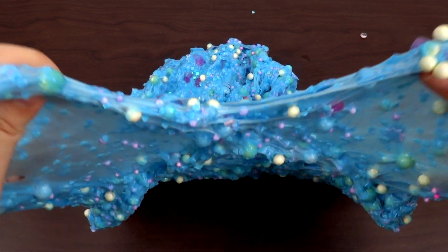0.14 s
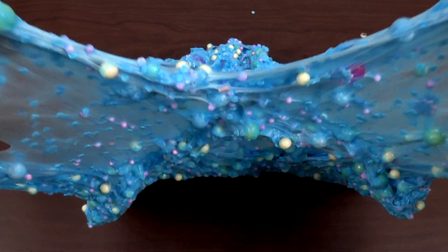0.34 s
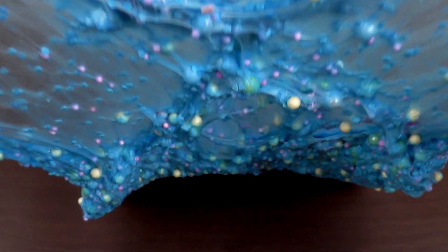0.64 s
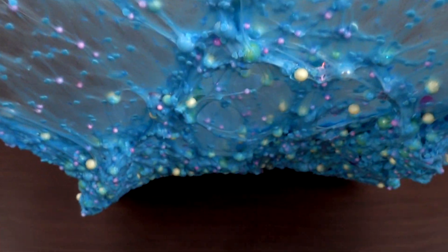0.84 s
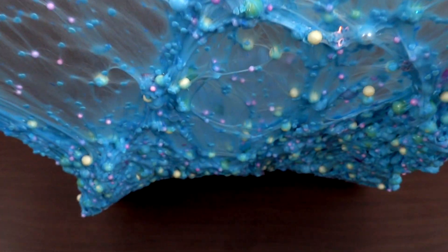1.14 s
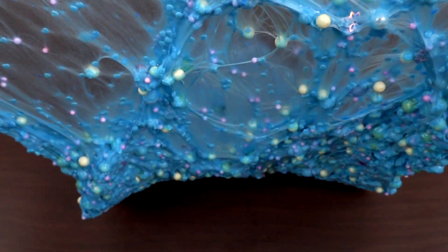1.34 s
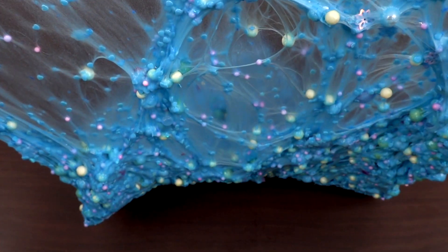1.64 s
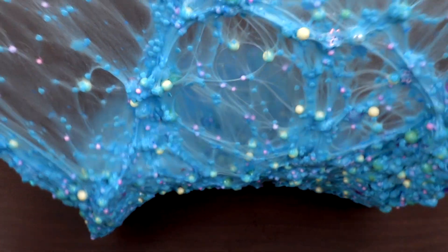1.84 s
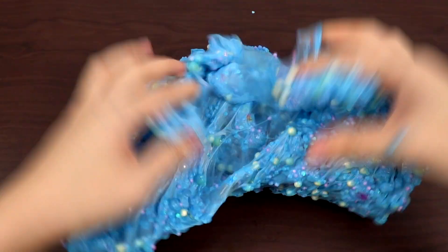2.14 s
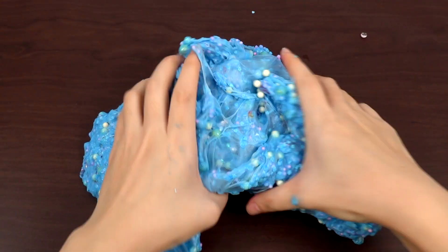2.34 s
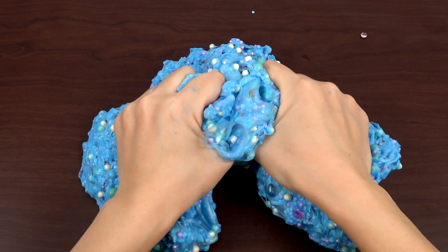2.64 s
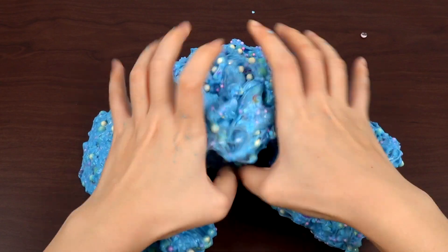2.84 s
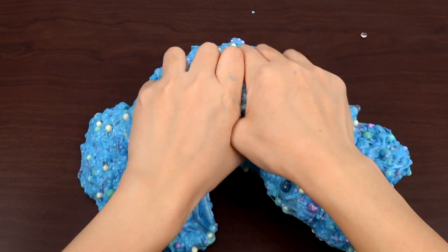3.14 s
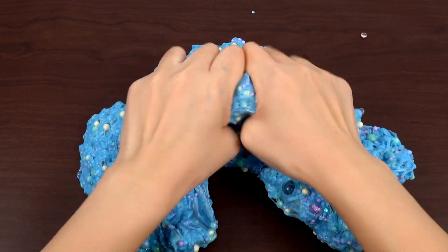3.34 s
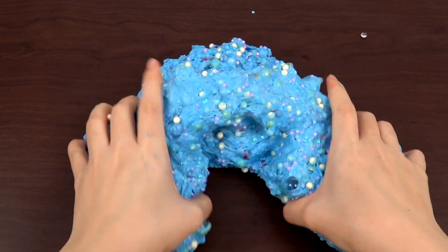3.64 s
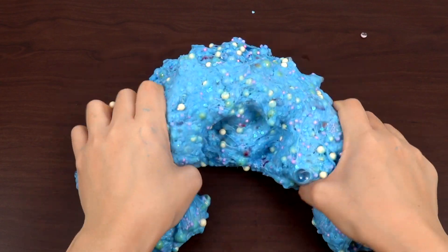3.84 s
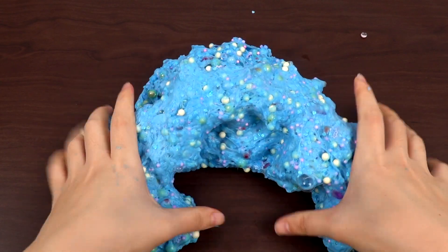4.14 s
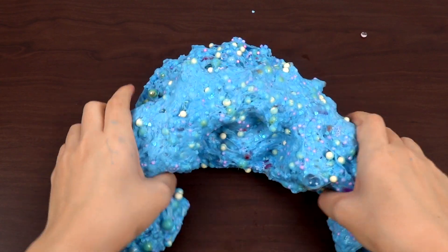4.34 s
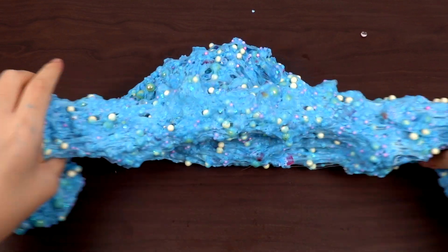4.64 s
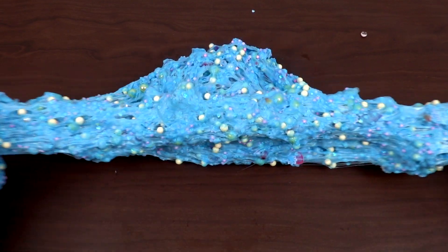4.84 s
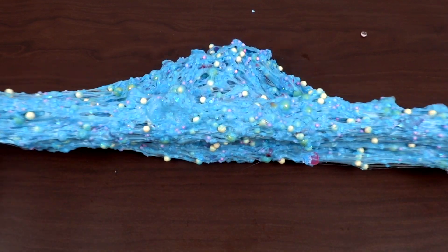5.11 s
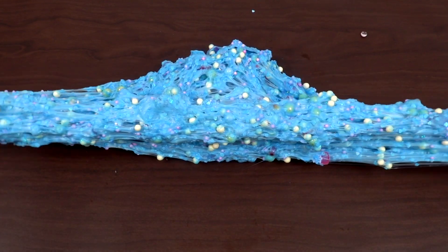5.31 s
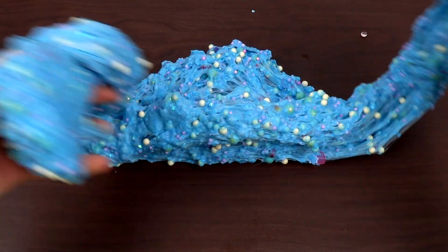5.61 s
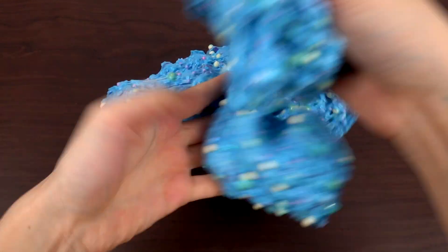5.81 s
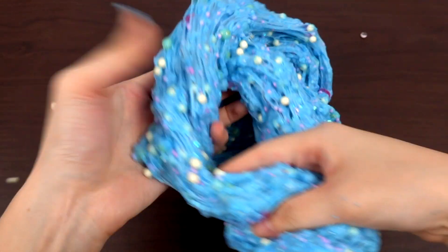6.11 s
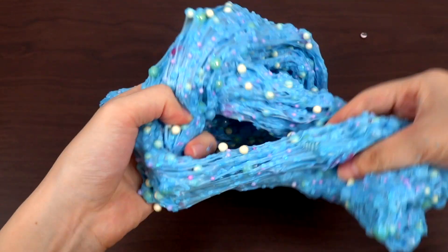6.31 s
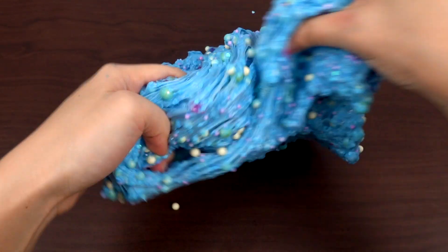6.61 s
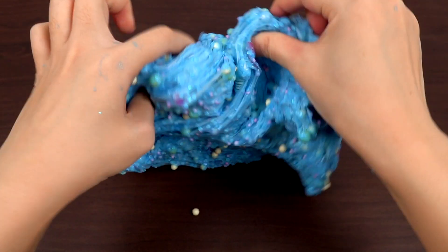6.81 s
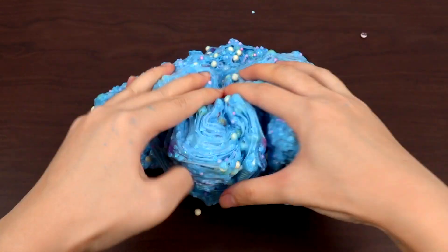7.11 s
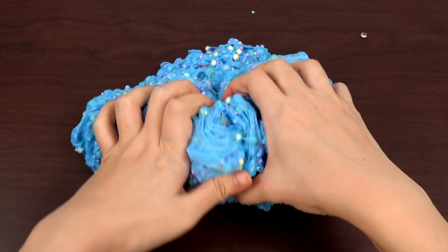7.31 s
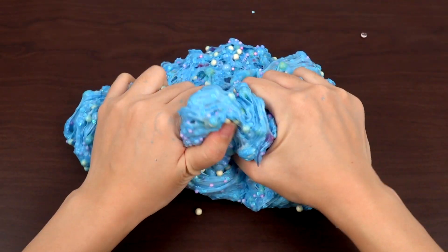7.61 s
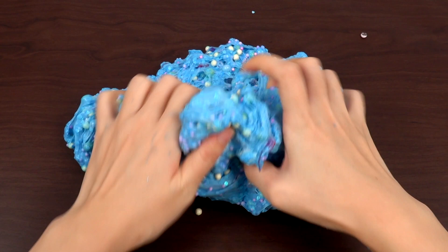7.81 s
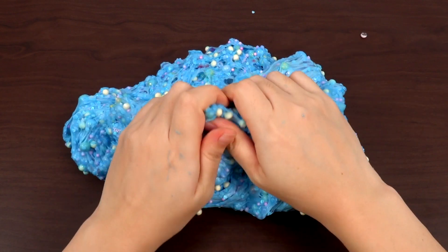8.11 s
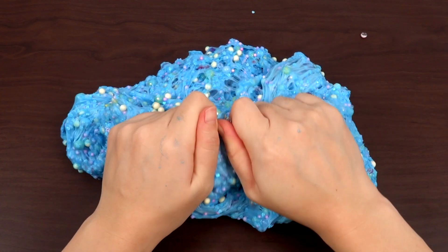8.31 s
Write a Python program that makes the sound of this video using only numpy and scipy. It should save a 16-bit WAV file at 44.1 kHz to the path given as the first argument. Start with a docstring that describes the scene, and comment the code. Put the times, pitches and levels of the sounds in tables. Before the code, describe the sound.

Crunchy, wet slime is worked by hand on a wooden table, heard very near in stereo. Quiet isolated pops come first, then a lull, then dense crackling squeezes with a left-sided bassy thump of air and bright bubble snaps. A soft thud precedes lighter stretching crackles. Folding grows busier, with hard pops, a brief descending slurp and a last crackling cluster over faint room hush.

```python
"""Hands work bead-filled slime on a wooden table in a quiet room, close to a stereo microphone: a few ringing pops
(air pockets) and a light crackle (tiny bursts in clumps), a lull, then from 2 s pulls, folds and squeezes with wet
squelches and filtered-noise rumble of moved air. At 2.5 s a squeezed-out puff jolts the left side into overload, and
the loudest pops follow; at 4.2 s the slime's end thuds down, a low ring. The work thins, then thickens from 6.7 s;
hard pops at 7.6 s, a sliding slurp at 7.8 s and last bursts close it. Faint echoes and noise hush lie beneath."""
import sys
import numpy as np
from scipy import signal
from scipy.fft import rfft, irfft
from scipy.io import wavfile

SR = 44100
rng = np.random.default_rng(int(sys.argv[2]) if len(sys.argv) > 2 else 0)


def bounce(signal):
    """Save signal as a 16-bit WAV file at the path given by the first command-line argument."""
    frames = np.transpose(np.atleast_2d(signal))
    limited = np.clip(frames, -1, 1)
    pcm = np.round(limited * 32767).astype(np.int16)
    wavfile.write(sys.argv[1], SR, pcm)


N = 373086
LEFT_RIGHT = np.array([[.5], [-.5]])     # shares a left minus right difference between the channels


def from_db(db):
    """Decibels to gain."""
    return 10 ** (np.asarray(db) / 20)


def rms_one(x):
    """Scale to rms 1."""
    return x / np.sqrt(np.mean(x ** 2) + 1e-20)


def at_hz(points, hz):
    """Read a spectrum by straight lines on a log-frequency axis."""
    points_hz, points_db = np.transpose(points)
    return np.interp(np.log(hz), np.log(points_hz), points_db)


def in_time(rows):
    """Join the rows of a table of curves by straight lines in time."""
    s, *columns = np.transpose(rows)
    return [np.interp(np.arange(N) / SR, s, c) for c in columns]


def drift(rate_hz):
    """Slow random wander of spread 1: noise through two equal low-pass poles, run at every 40th sample."""
    r = np.exp(-2 * np.pi * rate_hz * 40 / SR)
    slow = signal.lfilter([1], [1, -2 * r, r * r], rng.standard_normal(N // 40 + 2002))
    slow = slow[2000:]     # drop the filter's start
    return np.interp(np.arange(N) / 40, np.arange(len(slow)), rms_one(slow))


def stereo_noise(spectrum, alike):
    """Noise of a given spectrum, partly shared by both channels; rms 1."""
    mid, side = rng.standard_normal((2, N))
    pair = np.sqrt(1 + alike) * mid + np.sqrt(1 - alike) * side * [[1], [-1]]
    hz = np.maximum(np.arange(N // 2 + 1) * SR / N, 1)
    return rms_one(irfft(rfft(pair) * from_db(at_hz(spectrum, hz)), N))


# bursting air pockets; the overtone is relative to the lower pitch
# columns: start_s, peak_db, pitch_hz, overtone_db
POCKETS = [(0.0337, -24.5, 2840, -8.5), (0.038, -31, 2660, 12), (0.1909, -37, 1490, -1),
           (0.1983, -31, 1444, 12), (0.2138, -40, 4930, 3), (0.405, -31.5, 1530, 9), (0.4534, -35, 4600, 2),
           (0.6957, -40, 5110, 0), (0.7457, -40, 3950, -2), (0.771, -30.5, 4800, -18),
           (0.8735, -35.5, 2940, 1), (1.038, -40, 5510, 4), (1.0482, -39, 1310, -1),
           (1.3449, -42, 7130, -18), (1.4873, -42.5, 1760, -1), (1.7272, -31.5, 2830, 0),
           (1.8308, -41.5, 730, 0), (2.2114, -22.5, 5550, 1), (2.4286, -1.5, 5480, -1.5),
           (2.4616, -9, 5270, 12), (2.6185, -4.5, 2440, 0.5), (2.6457, -9.5, 3000, -1),
           (2.648, -9.5, 4750, -11), (2.6871, -3, 2410, -4), (2.688, -13, 280, 10), (2.7056, -20, 2420, 7),
           (2.7255, -10.5, 2920, 12), (3.019, -20, 2780, -2), (3.0263, -16.5, 4900, -26),
           (3.0342, -2, 2640, -6.5), (3.0542, -13, 1020, 1), (3.085, -7, 990, 15), (3.1145, -11, 1000, 8),
           (3.1192, -13, 990, 17), (3.1692, 5.5, 3380, -12.5), (3.18, -18, 3280, 9),
           (3.2222, -9.5, 4500, -8), (3.236, -4, 2400, 7), (3.24, -13, 2190, 12),
           (3.2708, -16.5, 2670, -13), (3.297, -26, 2760, -2), (3.3226, -12, 2210, -2.5),
           (3.328, -3, 5560, 6), (3.3525, -19.5, 4930, 0), (3.4187, -24.5, 2900, -17),
           (3.5994, -31.5, 1690, 1), (3.6035, -34, 2120, -4), (3.6673, -16.5, 4640, 5),
           (3.714, -18.5, 746, 4), (3.8059, -19, 5360, 2), (3.8767, -20, 2730, 1), (3.886, -21.5, 440, -4),
           (3.888, -22, 284, 26), (3.9114, -15.5, 2740, 7), (3.9454, -21, 3900, -1),
           (4.0633, -25.5, 990, -7), (4.3296, -23, 3450, -4), (4.352, -26, 2300, -7),
           (4.3936, -21, 6200, -4), (4.5006, -24, 3160, 4), (4.5961, -15, 3260, 13), (4.6254, -28, 6380, 0),
           (4.6903, -21.5, 2580, 1.5), (4.7582, -27, 3140, -9), (4.8247, -30, 2460, 8),
           (4.8813, -19, 4410, 16), (4.8921, -28.5, 490, 21), (4.8925, -1, 5200, -3.5),
           (4.8974, -29, 4580, -8), (4.9344, -34, 1120, -3), (4.9991, -19.5, 5040, -2),
           (5.073, -35, 2900, -3), (5.264, -27, 2440, 0), (5.2744, -29, 2830, 2), (5.3054, -27.5, 630, 14),
           (5.3075, -21, 3700, -1), (5.437, -32, 2830, 4), (5.4477, -26, 3450, 1), (5.6414, -30, 1520, 9),
           (5.7082, -36.5, 2770, -8), (5.818, -24, 7000, 8), (6, -34, 1840, 1), (6.074, -24, 5310, -5),
           (6.0927, -26, 5930, 10), (6.171, -28.5, 1980, -4.5), (6.2312, -20.5, 4500, -3.5),
           (6.2674, -21, 3040, 0.5), (6.3774, -29, 1520, 0), (6.4192, -32, 5310, 8),
           (6.5497, -30, 5000, -3), (6.6471, -25.5, 5000, -1), (6.674, -11.5, 3240, -8.5),
           (6.6772, -15, 3120, -21), (6.6819, -17.5, 3000, -21), (6.747, -15, 5000, -8),
           (6.853, -40, 5350, 10), (6.8795, -31, 5310, 1), (6.9272, -23, 2880, -7),
           (6.9695, -15.5, 5650, 7), (7.014, -14, 5550, 2), (7.0309, -28, 5350, 7),
           (7.0909, -20.5, 3850, -5), (7.1608, -24.5, 5200, -5), (7.183, -24, 2300, -3),
           (7.2233, -16, 4140, -24), (7.3207, -20, 3140, 3), (7.3647, -18.5, 2830, 5),
           (7.4261, -18, 1700, 1), (7.461, -19, 3640, -8), (7.468, -24, 3160, 1), (7.489, -23, 5710, 5),
           (7.5372, -27, 3160, 13), (7.542, -29, 3280, 1), (7.5932, 5.5, 5430, 17), (7.6004, -5, 6100, 2),
           (7.6229, -8, 7130, 12), (7.6634, -12, 5150, 1), (7.6794, -9, 6100, 4), (7.7265, -29, 5270, -10),
           (7.7592, -32, 5400, -6), (7.8058, -30, 3720, -18), (8.1326, -18.5, 2390, 2.5),
           (8.1444, 2.5, 4900, -3.5), (8.1608, -10.5, 2500, 7), (8.237, -34, 4930, 11),
           (8.3031, -35, 2540, 3), (8.3521, -22, 5540, -11), (8.361, -19.5, 3540, -9),
           (8.3647, -30, 2940, -7), (8.378, -17, 5140, 0), (8.3955, -21.5, 3670, -3),
           (8.4036, -13.5, 6620, -4), (8.4074, -23.5, 1575, -7.5), (8.421, -21, 5140, -3),
           (8.4426, -18.5, 3700, -13)]
OVERTONE = 1.744     # ratio of a pocket's upper pitch to its lower


def pops(cycles, second_cycles, snap_db, pan_db, lag_us):
    """The skin tears with a snap, then the pocket of air rings a few cycles at two pitches."""
    length = 400     # samples given to each pop
    out = np.zeros((2, N + length))
    luck = rng.standard_normal((len(POCKETS), 9))
    for (start_s, peak_db, pitch_hz, overtone_db), chance in zip(POCKETS, luck):
        lag_s = lag_us * 1e-6 * (1.73 * chance[8] - 1)     # the left leads more often
        t = np.maximum(np.arange(length) / SR - lag_s * LEFT_RIGHT - 2 / SR, 0)

        def burst(hz, ring_cycles):
            """A quick attack and a bell-like fade; higher pitches ring for more cycles."""
            turns = hz * t
            attack = 1 - np.exp(-turns / 0.32)
            fade = np.exp(-(turns / (ring_cycles * np.sqrt(hz / 3000))) ** 1.55)
            return attack * fade * np.sin(2 * np.pi * turns)

        snap = sum(burst(2500 * 1.71 ** (k + 0.17 * chance[k]), 0.25) * chance[k + 1] for k in range(5))
        pop = burst(pitch_hz, cycles)
        pop = pop + from_db(overtone_db) * burst(OVERTONE * pitch_hz, second_cycles)
        pop = pop + from_db(snap_db) * snap
        # each pop is thinned out below its lower pitch
        pop = signal.lfilter(*signal.butter(2, 0.63 * pitch_hz, "high", fs=SR), pop)
        pop *= np.sign(chance[6]) * from_db(peak_db) / np.abs(pop).max()
        at = round(start_s * SR)
        out[:, at:at + length] += pop * from_db(pan_db * chance[7] * LEFT_RIGHT)
    return out[:, :N]


# each pull, fold or squeeze; treble and squelch are relative to the crackle
# columns: start_s, end_s, crackle_start_db, crackle_end_db, treble_db, squelch_db
STROKES = [(0.036, 0.069, -49, -57, -7, -18), (0.103, 0.117, -66, -57, -4, 7),
           (0.178, 0.245, -61, -58.5, -17, -17), (1.932, 1.98, -55.5, -52, -1.5, -23),
           (1.994, 2.081, -46.5, -54.5, 3.5, -20), (2.177, 2.4, -44.5, -50.5, -6.5, -8.5),
           (2.432, 2.462, -39, -44, 0.5, -6.5), (2.534, 2.625, -42, -38.5, -12, -11),
           (2.632, 2.698, -27.5, -28, -23, -15), (2.813, 2.893, -42.5, -41, -2.5, -4),
           (3.026, 3.07, -35.5, -41.5, -12, -19), (3.08, 3.134, -41.5, -35.5, -14.5, -5),
           (3.16, 3.19, -38.5, -40, 4, -16), (3.216, 3.329, -47, -36.5, -7, -13),
           (3.418, 3.496, -44, -42.5, -7, -4), (3.613, 3.637, -50.5, -61, -5, -1),
           (3.677, 3.975, -39.5, -43, -6.5, -9.5), (4.049, 4.183, -46, -45.5, -2.5, -6),
           (4.232, 4.285, -48, -53, -3.5, -12), (4.315, 4.594, -45.5, -45.5, -5, -6.5),
           (4.619, 4.858, -45.5, -47, -9.5, -16.5), (4.879, 4.995, -41.5, -54, -4.5, -21),
           (5.036, 5.326, -55.5, -50.5, -8.5, -17), (5.38, 5.465, -58, -58.5, 4, -13),
           (5.493, 5.732, -65.5, -60.5, -5.5, -17), (5.769, 5.984, -53, -51, -3.5, -25),
           (6.078, 6.226, -47, -58.5, -2, -11), (6.22, 6.593, -55, -49, -2.5, -18),
           (6.68, 6.92, -43.5, -50.5, -4.5, -12.5), (6.939, 7.057, -45, -45, -7, -23),
           (7.094, 7.232, -42, -42.5, -8.5, -16), (7.28, 7.557, -43, -43.5, -4, -12),
           (7.599, 7.707, -38, -50, 6, -9), (7.821, 7.898, -43, -36, -5, -7.5),
           (8.043, 8.103, -48.5, -52.5, -3, -18), (8.14, 8.325, -43, -50.5, -7.5, -6.5),
           (8.364, 8.46, -40, -44.5, -5.5, -10.5)]
# the slime left to sag
# columns: crackle_db, treble_db, squelch_db
REST_LEVELS = (-70, -71.5, -70)
RISE_DB_PER_S, FALL_DB_PER_S = 396, 444     # how fast a stroke swells and dies away
GRIP_DB, GRIP_HZ = 2.5, 16.3     # the fingers stick and slip unevenly within a stroke


def effort():
    """Every stroke swells, runs from its first level to its last and dies; crackle, treble and squelch in dB."""
    t = np.arange(0, N + 64, 64) / SR
    power = from_db(REST_LEVELS)[:, None] ** 2
    for start_s, end_s, start_db, end_db, treble_db, squelch_db in STROKES:
        db = np.interp(t, [start_s, end_s], [start_db, end_db])
        db = db - RISE_DB_PER_S * np.maximum(start_s - t, 0)
        db = db - FALL_DB_PER_S * np.maximum(t - end_s, 0)
        power = power + from_db(db + np.array([[0], [treble_db], [squelch_db]])) ** 2
    levels_db = np.array([np.interp(np.arange(N) / SR, t, 10 * np.log10(layer)) for layer in power])
    return levels_db + GRIP_DB * drift(GRIP_HZ)


def grains(spectrum, per_s, spread_db, cycles, lag_us, clump_db, seep, patchy_db, count):
    """Random bursts in clumps, each falling 60 dB in a few cycles of its pitch; lows and highs apart, rms 1 each."""
    sizes = from_db(spread_db * np.minimum(rng.exponential(1, N), 4)) * rng.choice([-1, 1], N)
    born = rng.random(N) < per_s * from_db(clump_db * drift(30)) / SR
    lag = lag_us * 1e-6 * SR * (rng.standard_normal(N) - 1)     # in samples, mostly left of centre
    mid_and_lag = np.array([np.ones(N), lag])
    dealt = rng.integers(0, count, N)     # which pitch each burst gets
    bursts = sizes * born + seep * rng.standard_normal(N)     # air seeping out between the beads fills the gaps
    out = np.zeros((2, 2, N))     # lower and upper pitches, each in stereo
    for k, hz in enumerate(np.geomspace(spectrum[0][0], spectrum[-1][0], count)):
        r, w = from_db(-60 * hz / (cycles * SR)), 2 * np.pi * hz / SR
        # energy follows the width of each pitch's band
        gain = from_db(at_hz(spectrum, hz)) * hz / SR / np.sin(w / 2 + 0.42)
        mine = bursts * (dealt == k) * mid_and_lag
        mid, lagged = signal.lfilter([gain, 0, -gain], [1, -2 * r * np.cos(w), r * r], mine)
        pair = mid - np.gradient(lagged) * LEFT_RIGHT     # a small delay is a share of the slope
        out[int(hz > 6500)] += from_db(patchy_db * drift(10)) * pair     # pockets of one size burst in flocks
    return rms_one(out[0]), rms_one(out[1])


# colour of the tiny bursts
# columns: frequency_hz, density_db (per Hz)
CRACKLE_COLOUR = [(290, -19), (500, -3), (538, -3), (795, -3.5), (1060, -0.5), (1210, -2), (1690, -2),
                  (5160, 2), (8090, -15.5), (10500, 3.5), (14700, -20), (16000, -42)]


def crackle():
    """A dense crowd of tiny air pockets bursting, as low and high layers of rms 1."""
    return grains(CRACKLE_COLOUR, per_s=2200, spread_db=4.66, cycles=6.5, lag_us=16.7,
                  clump_db=4.5, seep=0.33, patchy_db=2.5, count=16)


# colour of the wet mass
# columns: frequency_hz, density_db (per Hz)
SQUELCH_COLOUR = [(120, 0.5), (250, 6.5), (500, -3), (1000, -6), (1800, -51)]


def squelch():
    """The wet mass gives in sparser, lower bursts; only the low layer holds sound, at rms 1."""
    low, _ = grains(SQUELCH_COLOUR, per_s=500, spread_db=3.83, cycles=4.75, lag_us=237,
                    clump_db=3.5, seep=0.035, patchy_db=3.0, count=7)
    return low


# a wet fold opening, its pitch sliding down
# columns: start_s, end_s, from_hz, to_hz, level_db
FOLD = (7.84, 7.92, 750, 200, -46)


def slurp():
    """A wobbling tone from a cavity that opens as the thumbs press."""
    start_s, end_s, from_hz, to_hz, level_db = FOLD
    share = np.clip((np.arange(N) / SR - start_s) / (end_s - start_s), 0, 1)
    hz = from_hz * (to_hz / from_hz) ** share * (1 + .08 * drift(56.7))
    swell = np.sin(np.pi * share) ** .5
    return from_db(level_db + 4.6 * drift(53)) * swell * np.sin(2 * np.pi * np.cumsum(hz) / SR)


# the slime's end drops on the table; t60_s is the time to fall 60 dB
# columns: start_s, pitch_hz, level_db, t60_s
DROP = (4.213, 95, -36, .09)


def thud():
    """A soft, short low ring of the table top."""
    start_s, pitch_hz, level_db, t60_s = DROP
    t = np.maximum(np.arange(N) / SR - start_s, 0)
    return from_db(level_db - 60 * t / t60_s) * np.sin(2 * np.pi * pitch_hz * t)


# the puff at the diaphragm, left row then right row; heights in units of full scale
# columns: step_height, recovery_s, rebound_height, rebound_s, swing_db, swing_hz, swing_t60_s, swing_delay_s
PUFF = [(-1.32, 0.0075, 0.13, 0.049, -10.5, 30, 0.55, 0.0095),
        (-0.023, .007, 0.11, 0.026, -23, 29, .4, 0.019)]
PUFF_S = 2.5178


def jolt():
    """The puff throws the diaphragm off rest; it recovers, rebounds past rest and swings on."""
    out, t = np.zeros((2, N)), np.arange(N) / SR - PUFF_S
    for side, row in enumerate(PUFF):
        height, recovery_s, rebound, rebound_s, swing_db, swing_hz, t60_s, delay_s = row
        after, late = np.maximum(t, 0), np.maximum(t - delay_s, 0)
        out[side] = (t > 0) * height * np.exp(-(after / recovery_s) ** 2)
        out[side] += rebound * after / rebound_s * np.exp(1 - after / rebound_s)
        out[side] += from_db(swing_db - 60 * late / t60_s) * np.sin(2 * np.pi * swing_hz * late)
    return out


# moved air on the microphone ports; the pan is left minus right
# columns: time_s, rumble_db, buffet_db, pan_db
AIR = [(0, -59, -67, 2), (1.36, -54.5, -65, -4), (1.44, -44, -52.5, -6), (1.55, -43, -63.5, -3),
       (1.85, -60, -77, 1), (2.15, -30.5, -54.5, 1), (2.48, -40.5, -49.5, 6), (2.69, -29.5, -49, -2),
       (3.13, -39.5, -58, 3), (3.4, -46, -67.5, 8), (3.72, -41.5, -56, 0.5), (4.1, -40.5, -61, 0),
       (4.25, -44, -46, 1), (4.54, -45.5, -76, 2), (5.7, -64, -74, 0), (6.0, -45, -60.5, 3),
       (6.6, -50.5, -71, -2), (7.0, -47.5, -68, 1), (7.75, -43.5, -66, 2), (7.9, -39.5, -50, 2),
       (8.08, -38, -64, 5), (8.25, -45.5, -62, -5), (8.46, -53, -61, 2)]


def moved_air():
    """A deep rumble with a lumpier, faster buffeting on top, leaning to the port the air reaches."""
    rumble_db, buffet_db, pan_db = in_time(AIR)
    # colours as (Hz, dB per Hz)
    rumble = stereo_noise([(3, -37), (10, 7.5), (22, 17.5), (40, 2.0), (70, -6.5), (130, -26), (300, -55)],
                          alike=0.62)
    buffet = stereo_noise([(30, -24), (60, 3), (110, -5), (250, -10), (500, -45)], alike=0.36)
    air = from_db(rumble_db + 1.2 * drift(19)) * rumble
    air = air + from_db(buffet_db + 3.7 * drift(25)) * buffet
    return air * from_db(pan_db * LEFT_RIGHT)


ROOM_T60_S, ROOM_DB, WALL_CUT_HZ = .2, -9.5, 22000
FIRST_ECHO_S, EARLY_S = 0.0018, 0.015


def room(x):
    """A faint echo off the table at once, then a dense noise tail, partly shared by both channels."""
    t = np.arange(SR // 4) / SR
    shared, left, right = rng.standard_normal((3, len(t)))
    onset = np.where(t > FIRST_ECHO_S, 1, .3)
    # near walls answer together, then the room dies
    fade = np.exp(-(t / EARLY_S) ** 2) + 0.72 * from_db(-60 * t / ROOM_T60_S)
    tail = (1.13 * shared + np.array([left, right])) * onset * fade
    tail = signal.lfilter(*signal.butter(1, WALL_CUT_HZ, fs=SR), tail)
    tail /= np.sqrt(np.sum(tail ** 2) / 2)
    mono = x.mean(axis=0, keepdims=True)
    return from_db(ROOM_DB) * signal.fftconvolve(mono, tail, axes=1)[:, :N]


# colour of room and microphone noise
# columns: frequency_hz, density_db (per Hz)
HUSH_COLOUR = [(15, -8.5), (25, 2), (63, -4.5), (286, -23), (465, -24), (547, -29), (778, -27.5),
               (1530, -30.5), (1850, -34), (7550, -36), (9130, -38.5), (13700, -38.5), (16100, -46)]
HUSH_DB = -57


def hush():
    """Steady room and microphone noise, nearly separate in the two channels."""
    return from_db(HUSH_DB) * stereo_noise(HUSH_COLOUR, alike=0.084)


def scene():
    """Slime on the table, its room, moved air, the jolt and the hush."""
    crackle_db, treble_db, squelch_db = effort()
    low, high = crackle()
    slime = from_db(crackle_db) * low + from_db(treble_db) * high + from_db(squelch_db) * squelch()
    slime = slime + slurp() + thud()
    slime = slime + pops(cycles=1.37, second_cycles=1.62, snap_db=-8.5, pan_db=1.8, lag_us=10.7)
    # the slime's sounds lose their top treble above 14 kHz
    slime = signal.sosfilt(signal.butter(2, 14000, fs=SR, output="sos"), slime)
    return slime + room(slime) + moved_air() + jolt() + hush()


def record(dry):
    """Overload clips at full scale, then a steep low-pass cuts the top: 60 dB down from 16.4 kHz."""
    low_pass = signal.cheby2(12, 60, 16400, fs=SR, output="sos")
    cut = signal.sosfilt(low_pass, np.clip(dry, -1, 1))
    return np.clip(cut, -1, 1)


dry = scene()
out = record(dry)
bounce(out)
```